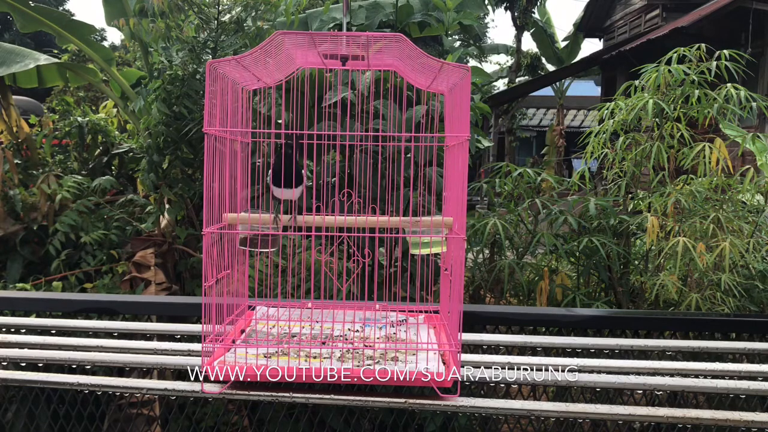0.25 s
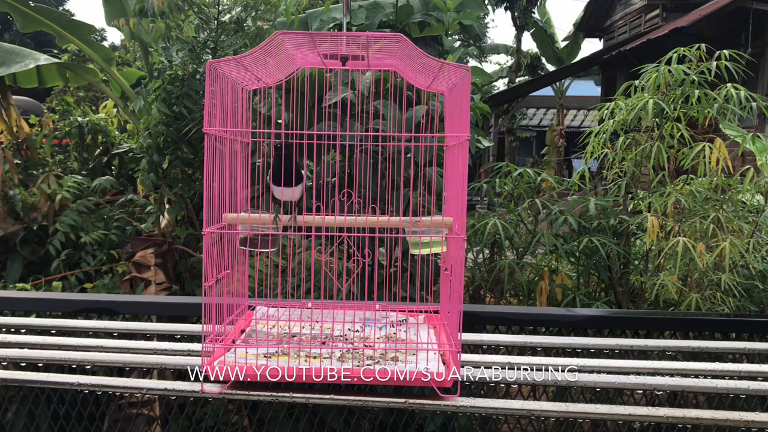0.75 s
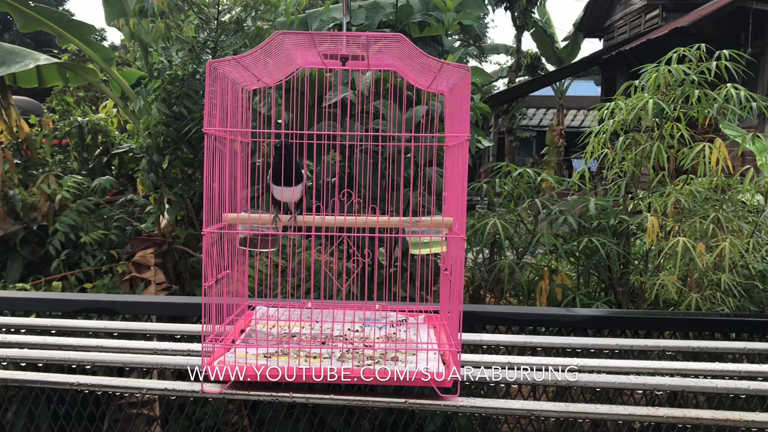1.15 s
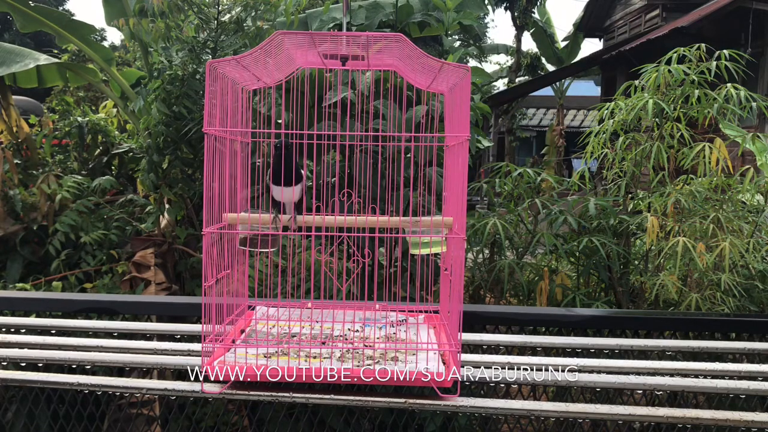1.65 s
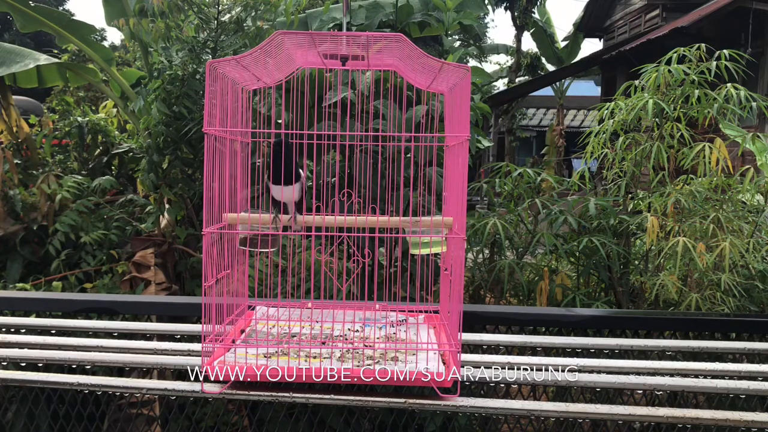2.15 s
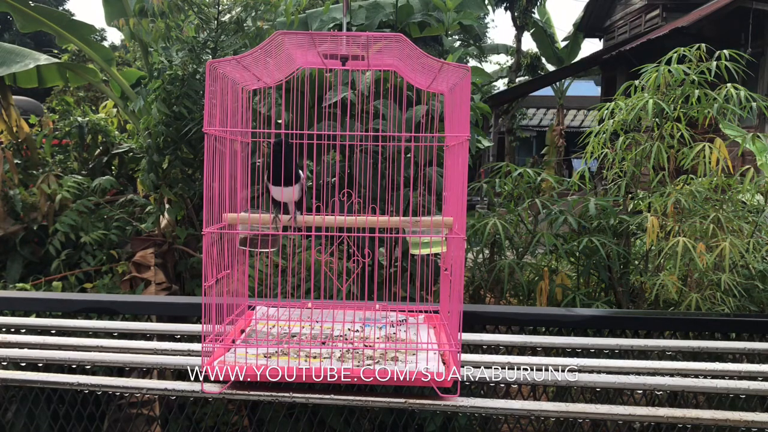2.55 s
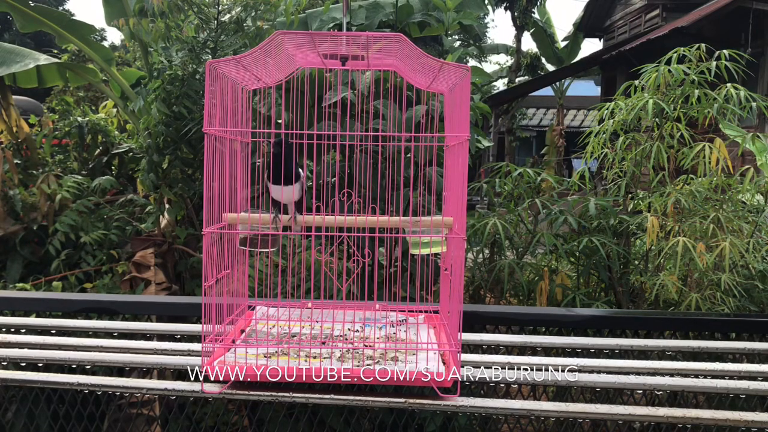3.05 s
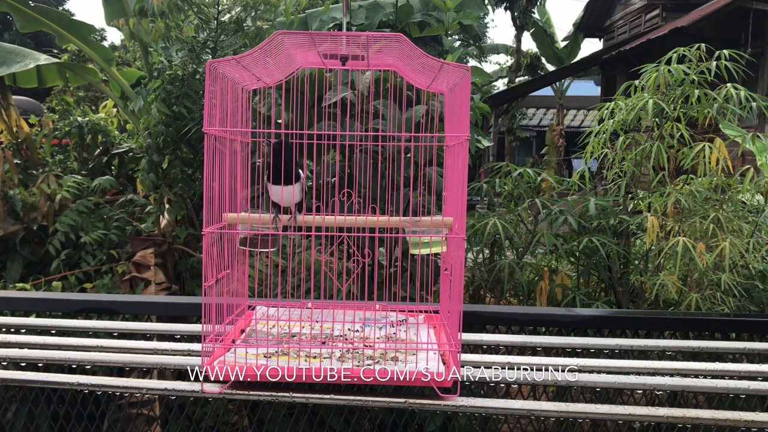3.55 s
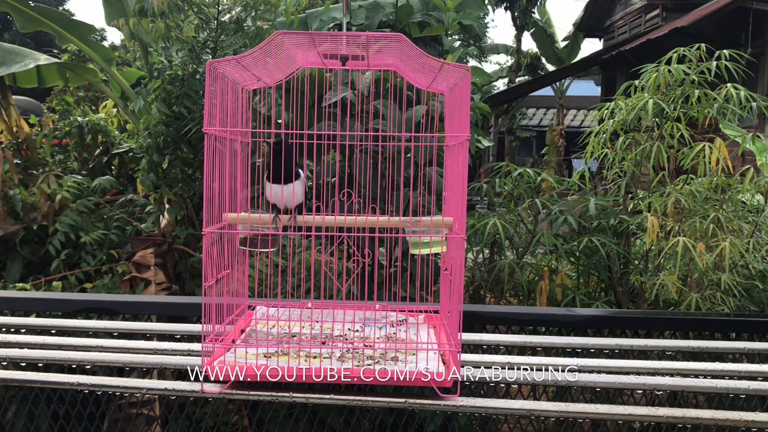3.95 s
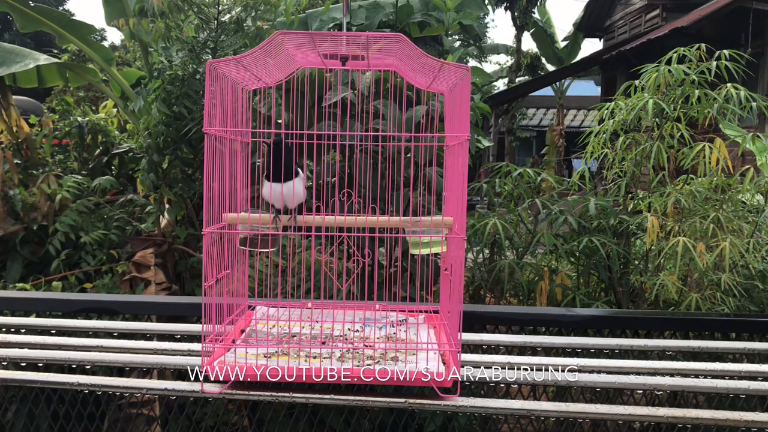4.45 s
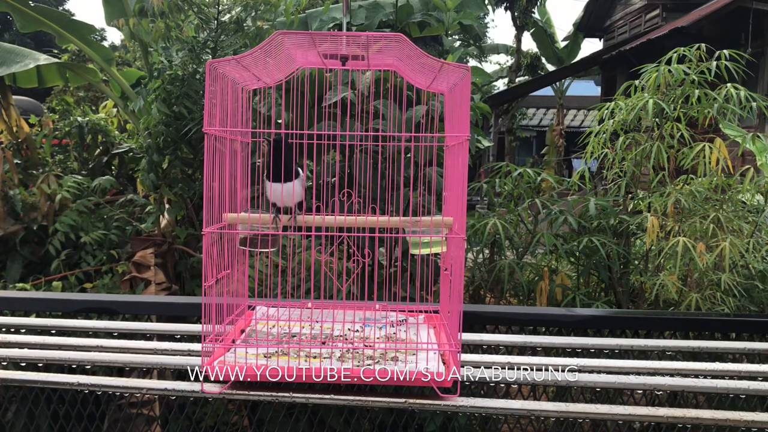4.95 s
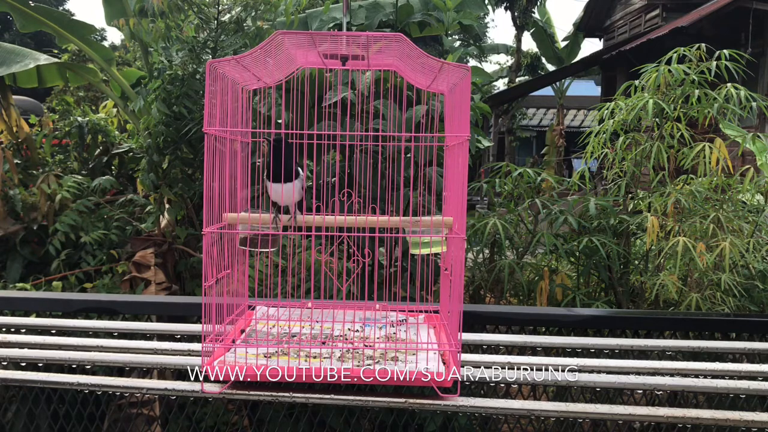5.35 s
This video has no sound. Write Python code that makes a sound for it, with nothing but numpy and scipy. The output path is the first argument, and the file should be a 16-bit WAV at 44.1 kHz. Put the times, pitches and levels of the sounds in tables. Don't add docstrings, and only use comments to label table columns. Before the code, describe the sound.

Outdoors in a garden between walls, a bird whistles separate quick syllables with gaps between them, high and piercing, often two pitches overlapping with a slightly buzzy edge. Another caller whistles very faintly far off. Low engine rumble and gentle hiss lie underneath, with barely audible electronic ticking. The song stops before four seconds; later the feathers brush once, softly. Mono phone pickup, close but airy.

```python
import sys
import numpy as np
from scipy import signal
from scipy.fft import rfft, irfft, next_fast_len
from scipy.io import wavfile
from scipy.ndimage import uniform_filter1d

SR = 44100
rng = np.random.default_rng(int(sys.argv[2]) if len(sys.argv) > 2 else 0)


def log_audio(samples):
    frames = np.atleast_2d(samples).T
    limited = np.clip(frames, -1, 1)
    pcm = np.round(limited * 32767).astype(np.int16)
    wavfile.write(sys.argv[1], SR, pcm)


def rack_gain(trim_db):
    fader = np.asarray(trim_db, float)
    return 10 ** (fader / 20)


N = 246959
T = np.arange(N) / SR


def coloured(x, table):
    hz, db = np.transpose(table)
    n = next_fast_len(len(x))
    f = np.fft.rfftfreq(n, 1 / SR) + 1
    gain = rack_gain(np.interp(np.log(f), np.log(hz), db))
    return irfft(rfft(x, n) * gain, n)[:len(x)]


def level(x, db):
    return x * rack_gain(db) / np.sqrt(np.mean(x ** 2))


def walk(rate):
    k = int(SR / rate)
    return level(uniform_filter1d(uniform_filter1d(rng.standard_normal(N), k), k), 0)


def gate(start, end, edge=.003):
    return np.clip(np.minimum(T - start, end - T) / edge + .5, 0, 1)


# pitch_hz, level_db (per Hz)
GARDEN_COLOUR = [(12, -44), (20, -23), (53, -2), (166, -1), (197, -5.5), (353, -14), (500, -22.5),
                 (792, -22.5), (990, -19.5), (1400, -22.5), (1560, -27.5), (3020, -32), (3370, -32),
                 (6960, -41.5), (15600, -41.5)]
GARDEN_DB = -48
# pitch_hz, width_hz, level_db
ENGINES = [(64.3, 5, -52.5), (100.5, 10, -51.5), (161.5, 5.9, -58.5), (520, 24.4, -67.5)]
# start_s, level_db
ENGINE_SWELL = [(0, 0.5), (.9, -12.5), (1.2, -0.5), (2.8, -0.5), (4.3, 3), (4.7, -3.5), (5.6, -3)]
# pitch_hz, level_db
PORT = [(5000, 0.5), (6200, 2.5), (7500, -3.5), (9400, 5.5), (10600, -3.5), (13000, 5), (15600, 4)]


def garden():
    hiss = coloured(rng.standard_normal(N), GARDEN_COLOUR)
    spectrum, f = rfft(hiss), np.fft.rfftfreq(N, 1 / SR)
    bed, edges = 0, 20 * 2 ** np.arange(11.)
    for lo, hi in zip(edges, edges[1:]):
        octave = irfft(spectrum * ((f >= lo) & (f < hi)), N)
        bed = bed + octave * rack_gain(0.11 * walk(2.0))
    drone = 0
    for hz, width, db in ENGINES:
        resonance = 1 + ((f - hz) / width * 2) ** 2
        band = irfft(rfft(rng.standard_normal(N)) / resonance, N)
        drone = drone + level(band, db) * rack_gain(0.67 * walk(1.0))
    swell = rack_gain(np.interp(T, *np.transpose(ENGINE_SWELL)))
    return coloured(level(bed, GARDEN_DB) + drone * swell, PORT)


TICK_RATE, TICK_START_S, TICK_HZ, TICK_DB = 60, .0128, 13100, -48


def frame_ticks():
    at = np.arange(TICK_START_S, N / SR - .01, 1 / TICK_RATE)
    ticks, t = np.zeros(N), T[:100]
    ticks[(at * SR).astype(int)] = rack_gain(TICK_DB + 3.0 * rng.standard_normal(len(at)))
    ring = t / 0.00013 * np.exp(-t / 0.00018) * np.sin(2 * np.pi * TICK_HZ * t)
    return signal.oaconvolve(ticks, ring)[:N]


# start_s, end_s, clicks_per_s, first_level_db, last_level_db
SPUTTER = [(0.025, 0.11, 700, -56.5, -45), (0.117, 0.13, 1500, -44, -43.5), (0.416, 0.434, 950, -49, -52),
           (0.46, 0.476, 1200, -43, -51), (0.585, 0.615, 2000, -56, -55), (0.741, 0.774, 370, -48, -43),
           (0.826, 0.85, 700, -52, -51), (1.155, 1.171, 1100, -48, -44), (1.174, 1.181, 1100, -42, -47),
           (1.229, 1.29, 1500, -46, -51), (1.71, 1.745, 2300, -56, -45), (1.822, 1.8225, 1500, -48, -48),
           (1.908, 1.916, 1500, -54, -54), (1.927, 1.933, 2300, -46, -44), (1.94, 1.95, 1300, -33, -42),
           (1.955, 2.0, 780, -50, -51.5), (2.211, 2.216, 900, -48, -52), (2.287, 2.303, 800, -33, -42),
           (2.305, 2.355, 350, -51, -47), (2.511, 2.52, 1500, -47, -42), (2.55, 2.578, 1200, -53, -46),
           (2.584, 2.596, 900, -46, -52), (2.863, 2.864, 900, -57, -57), (3.605, 3.66, 900, -58, -49),
           (3.708, 3.713, 820, -46, -46), (3.72, 3.75, 500, -59, -58), (3.755, 3.758, 680, -43, -46),
           (3.77, 3.774, 950, -47, -48), (3.78, 3.8, 300, -52, -58)]
RING_HZ = 3330


def sputter():
    clicks, t = np.zeros(N), T[:400]
    for start, end, rate, first_db, last_db in SPUTTER:
        late, loud = rng.standard_normal((200, 2)).T
        at = start + np.cumsum(np.exp(0.26 * late) / rate) - np.exp(0.34 * late[0]) / rate
        db = np.interp(at, (start, end), (first_db, last_db)) + 2.5 * loud
        heard = at < end
        clicks[(at[heard] * SR).astype(int)] = rack_gain(db[heard])
    ring = 8 * (t / 0.00022) ** 2 * np.exp(-t / 0.00024 + 2j * np.pi * RING_HZ * t) / 2
    return signal.oaconvolve(clicks, ring)[:N]


EDGE_S, EDGE_DB = .0035, -32


def edged(note):
    s, hz, db = np.transpose(note)
    s = np.r_[s[0] - EDGE_S, s, s[-1] + EDGE_S]
    return s, np.r_[hz[0], hz, hz[-1]], np.r_[db[0] + EDGE_DB, db, db[-1] + EDGE_DB]


# start_s, pitch_hz, level_db
STEP_UP = [
    [(0.027, 3148, -44), (0.035, 3580, -32.5), (0.039, 3664, -22), (0.043, 3715, -27), (0.054, 3599, -18),
     (0.07, 3677, -16), (0.103, 3750, -21), (0.114, 3670, -25), (0.126, 4040, -31.5)],
    [(0.077, 4308, -41.5), (0.102, 4520, -32.5), (0.115, 4330, -22.5), (0.124, 4410, -18),
     (0.131, 4500, -22), (0.139, 4376, -18), (0.166, 4488, -15.5), (0.199, 4408, -19), (0.203, 4300, -34.5)],
]
CROSSING = [
    [(0.369, 4223, -38.5), (0.389, 3851, -26), (0.399, 3914, -20.5), (0.433, 4074, -18),
     (0.451, 4022, -15.5), (0.471, 4020, -24.5), (0.483, 3817, -28), (0.555, 3594, -28.5),
     (0.56, 3600, -33)],
    [(.419, 2790, -42), (.427, 2890, -31), (.434, 2810, -43)],
    [(0.463, 3090, -31), (0.469, 3075, -25.5), (0.483, 3020, -25), (0.491, 3120, -22.5),
     (0.589, 3362, -17.5), (0.637, 3425, -14.5), (0.646, 3346, -31)],
]
DIP_RISE = [
    [(0.724, 2910, -41.5), (0.727, 2710, -38.5), (0.739, 2626, -31), (0.758, 2587, -25.5),
     (0.781, 2444, -28.5), (0.802, 2506, -25.5), (0.829, 2500, -27.5), (0.847, 2410, -33),
     (0.849, 2400, -33)],
    [(0.831, 3200, -37), (0.835, 3220, -22.5), (0.84, 3440, -22), (0.853, 3304, -18), (0.894, 3325, -22),
     (0.924, 3396, -19.5), (0.973, 3642, -16.5), (1.032, 3503, -20.5), (1.04, 3500, -37)],
]
DIP_RISE_AGAIN = [
    [(1.136, 2735, -43), (1.154, 2498, -28.5), (1.163, 2830, -30.5), (1.17, 2364, -33)],
    [(1.16, 3510, -36), (1.164, 3420, -33), (1.172, 3130, -44)],
    [(1.177, 2320, -30.5), (1.181, 2223, -29), (1.217, 2067, -32), (1.225, 2127, -29), (1.229, 2246, -32),
     (1.232, 2140, -31.5), (1.274, 2213, -31), (1.314, 2240, -33), (1.317, 2300, -31)],
    [(1.231, 2896, -28), (1.283, 3220, -30.5), (1.29, 3356, -23.5), (1.313, 3350, -23), (1.318, 3380, -17),
     (1.35, 3510, -18.5), (1.381, 3350, -22), (1.391, 3423, -20), (1.474, 3561, -21.5)],
]
LOW_AND_HARSH = [
    [(1.708, 2220, -46), (1.718, 1914, -44), (1.745, 2013, -34), (1.766, 2067, -25), (1.776, 2033, -25),
     (1.809, 2031, -30), (1.815, 1950, -33), (1.822, 1807, -40)],
    [(1.909, 2160, -44.5), (1.926, 2526, -33.5), (1.94, 2846, -21.5)],
    [(1.943, 3110, -15.5), (1.957, 3360, -15), (1.968, 2977, -17), (1.988, 2738, -26.5),
     (2.01, 2696, -25.5), (2.047, 2707, -26), (2.078, 2820, -23.5), (2.083, 2926, -19),
     (2.097, 2614, -27.5)],
]
DROP = [
    [(2.211, 3436, -37.5), (2.219, 3403, -27.5), (2.243, 3410, -17.5), (2.257, 3385, -16.5),
     (2.269, 3256, -18), (2.285, 2840, -22.5), (2.29, 2760, -26)],
    [(2.293, 2152, -34), (2.315, 2241, -27), (2.355, 2214, -25), (2.371, 2083, -30)],
]
STEP_UP_LONG = [
    [(2.509, 2960, -50), (2.513, 3105, -36), (2.526, 3440, -20.5), (2.543, 3370, -19), (2.552, 3633, -13.5),
     (2.566, 3778, -17), (2.587, 3536, -14.5), (2.63, 3583, -21.5), (2.636, 3410, -27.5)],
    [(2.586, 4360, -24.5), (2.598, 4300, -24.5), (2.61, 4450, -20.5), (2.641, 4404, -20), (2.66, 4340, -20),
     (2.686, 4400, -21), (2.728, 4445, -20.5), (2.757, 4466, -22), (2.777, 4387, -22)],
]
TRILLS = [
    [(2.864, 5260, -40), (2.876, 5050, -37), (2.887, 4950, -33), (2.903, 4600, -24), (2.912, 4667, -23),
     (2.925, 4985, -25.5), (2.962, 3660, -20.5), (2.989, 3656, -18), (3.013, 3543, -23.5)],
    [(3.123, 1976, -45.5), (3.148, 2078, -29.5), (3.162, 2067, -27), (3.172, 1976, -34),
     (3.18, 2193, -26.5), (3.202, 2306, -28.5), (3.237, 2254, -29.5), (3.281, 2458, -29.5),
     (3.288, 2220, -41)],
]
STEP_UP_LAST = [
    [(3.579, 3674, -22.5), (3.584, 3800, -26.5), (3.599, 3658, -17), (3.631, 3650, -14), (3.655, 3733, -18),
     (3.675, 3796, -16.5), (3.679, 3678, -19.5), (3.708, 3706, -24), (3.71, 3690, -27)],
    [(3.62, 4600, -52), (3.66, 4560, -35), (3.693, 4250, -25.5), (3.716, 4650, -27), (3.74, 4540, -26),
     (3.762, 4670, -22.5), (3.821, 4480, -18), (3.84, 4780, -22), (3.856, 4680, -40)],
]
PHRASE = (STEP_UP + CROSSING + DIP_RISE + DIP_RISE_AGAIN + LOW_AND_HARSH + DROP + STEP_UP_LONG
          + TRILLS + STEP_UP_LAST)
# level_db, tilt_db (per order)
BRIGHT = [(-7, -1), (-1.5, 0.5), (-4, 3.5), (16.5, 3.5), (-4.5, 1), (1.5, 2), (-11, 2.5), (6.5, -2.5),
          (10, 0.5), (9, 3.35), (1, -0.5), (3.5, 2.5), (18, -0.5), (-2.5, 3.5), (0.5, 0.5), (-6, 3.5),
          (2, 0), (-1, 13.5), (5.5, 0), (-1.5, 1.5), (-2, -1.5), (5.5, -7)]
BRIGHTEN_DB = [14, 7, -0.5, 1.5, -6.2, 1.5, 10.5, -6, -4, 15, 3.5, 9, 3, -1.5, 10, -1, 14.5, 2.5, -16.5, 17,
               7, -10.5]
ORDER_DB = [-17.5, -24, -33.5, -32, -37, -32]
MIXED_DB = [-9.5, -20.5, -24.5]
# pitch_hz, level_db
THROAT = [(3000, -0.5), (4500, 0), (6000, -4.5), (7500, -4.5), (9000, -7), (10500, -5.5), (12000, 4),
          (13300, 4), (14300, -1.5), (15200, -8.5), (17000, -10)]
# start_s, end_s, timing_error_rad
HAZE = [(.05, .125, .2), (.46, .56, .09), (.59, .645, .05), (1.23, 1.29, .08), (1.943, 2.0, .11),
        (2.0, 2.1, .05), (2.29, 2.355, .1), (2.51, 2.56, .07), (2.56, 2.578, .13), (2.584, 2.6, .12),
        (2.93, 3.02, .08), (3.18, 3.29, .067), (3.62, 3.71, .09)]
WOBBLE_HZ, WOBBLE_DB, OVERTONE_FLICKER_DB = 13, 0.5, 2.5
PULL, SIDEBAND_SHARE = .4, .72
UPWARD = .2
RASP, RASP_RATE, FLUTTER_RASP = .35, 2500, .011
HALF_START_S, HALF_END_S, HALF_SHARE = 2.23, 2.25, .4
SHYNESS = 0.4
EFFORT = 0.033


def bird():
    swing_hz, gain = flutter()
    clicks = sputter() + creak()
    wobble_hz, wobble = WOBBLE_HZ * walk(250), rack_gain(WOBBLE_DB * walk(120))
    flow, size, voices = clicks.copy(), np.abs(clicks) + rack_gain(-87.5), []
    own = np.zeros((len(MIXED_DB), N), complex)
    for note in PHRASE:
        s, hz, db = edged(note)
        span = slice(int(s[0] * SR), int(s[-1] * SR))
        hz = np.interp(T[span], s, hz) + swing_hz[span] + wobble_hz[span]
        envelope = uniform_filter1d(rack_gain(np.interp(T[span], s, db)), size=80)
        a = np.sqrt(2) * envelope * gain[span] * wobble[span]
        phase = 2 * np.pi * np.cumsum(hz) / SR
        side = a * np.exp(1j * phase)
        flow[span] += side
        size[span] += a
        own[:, span] += [side ** k for k in range(2, len(MIXED_DB) + 2)]
        voices.append((span, hz, a, phase))

    pressure = np.abs(flow / size) ** 2
    beat = PULL * (pressure - uniform_filter1d(pressure, size=256))
    lift = np.exp(-UPWARD * signal.hilbert(beat, next_fast_len(N))[:N].imag)
    unrest = RASP * np.sqrt(uniform_filter1d(beat ** 2, size=256).clip(0))
    unrest += FLUTTER_RASP * uniform_filter1d(np.abs(np.diff(swing_hz, prepend=0)), size=256)
    unrest += sum(rad * gate(start, end) for start, end, rad in HAZE)
    jitter = unrest * walk(RASP_RATE)

    whistle, over = clicks.real.copy(), np.zeros(N)
    for k, db in enumerate(MIXED_DB, start=2):
        mixed = flow ** k - own[k - 2]
        over += rack_gain(db) * (mixed * np.exp(.5j * k * jitter)).imag / size ** (k - 1)
    flicker = [rack_gain(OVERTONE_FLICKER_DB * walk(65)) for _ in ORDER_DB]
    for (span, hz, a, phase), (bright_db, tilt_db), brighten_db in zip(voices, BRIGHT, BRIGHTEN_DB):
        pulled = phase + SIDEBAND_SHARE * beat[span] + 0.061 * jitter[span]
        whistle[span] += a * lift[span] * np.cos(pulled)
        growth = rack_gain(brighten_db * np.linspace(-.5, .5, len(a)))
        strength = a * growth * (a / a.max()) ** EFFORT
        uneven = 1 + HALF_SHARE * gate(HALF_START_S, HALF_END_S)[span] * np.cos(phase / 2)
        for k, db in enumerate(ORDER_DB, start=2):
            room_above = np.clip((18500 - k * hz) / 1500, 0, 1)
            shy = (a / size[span]) ** (SHYNESS * (k - 1))
            loudness = rack_gain(db + bright_db + tilt_db * (k - 2)) * flicker[k - 2][span]
            overtone = np.cos(k * (phase + beat[span] + jitter[span]))
            over[span] += strength * shy * loudness * uneven ** min(k - 1.7, 1) * room_above * overtone
    return coloured(whistle, [(1300, -30.0), (1750, 1)]) + coloured(over, THROAT)


# delay_s, level_db
ECHOES = [(.004, -18.5), (.011, -18), (.021, -21.5), (0.044, -28.5), (.128, -46)]
YARD_DB, YARD_T60_S, WALL_S = -26.5, 0.94, 0.17
TAIL_DB, TAIL_T60_S = -20, 0.53


def yard(x):
    t = T[:SR]
    near = level(rng.standard_normal(SR), 0) * rack_gain(-60 * t / YARD_T60_S)
    near *= np.clip((WALL_S - t) / 0.0081, 0, 1)
    far = rng.standard_normal(SR) * rack_gain(-60 * t / TAIL_T60_S)
    response = rack_gain(YARD_DB) * near / np.linalg.norm(near) + rack_gain(TAIL_DB) * far / np.linalg.norm(far)
    for s, db in ECHOES:
        response[int(s * SR)] += rack_gain(db)
    echoed = signal.fftconvolve(x, response)[:N]
    return coloured(echoed, [(2000, -3.0), (5000, -2.0), (10000, -5.5), (16000, -6.0)])


DUCK_HZ, DUCK_FROM_DB, DUCK_SLOPE, DUCK_S = 4600, -48.5, .35, .04


def ducked(bed, song):
    loud_db = 10 * np.log10(uniform_filter1d(song ** 2, int(DUCK_S * SR)).clip(1e-12))
    treble = signal.sosfiltfilt(signal.butter(4, DUCK_HZ, "high", fs=SR, output="sos"), bed)
    return bed - treble * (1 - rack_gain(-DUCK_SLOPE * np.clip(loud_db - DUCK_FROM_DB, 0, 40)))


# start_s, end_s, first_pitch_hz, last_pitch_hz, level_db
FAR = [
    (.09, .2, 1390, 1375, -53),
    (.14, .24, 1540, 1550, -58),
    (.12, .23, 780, 775, -54),
    (.24, .34, 835, 820, -55),
    (.23, .4, 1685, 1650, -54.5),
    (2.19, 2.26, 1120, 1260, -55),
    (2.27, 2.36, 1400, 1750, -53),
    (2.33, 2.5, 1680, 1780, -56),
    (4.27, 4.34, 3060, 2990, -69),
]
FAR_EDGE_S, FAR_BLUR_HZ = .03, 32


def far_caller():
    out = 0
    for start, end, first_hz, last_hz, db in FAR:
        blur_hz = (FAR_BLUR_HZ + abs(last_hz - first_hz) / 4) * walk(300)
        hz = np.interp(T, (start, end), (first_hz, last_hz)) + blur_hz
        whistle = np.sin(2 * np.pi * np.cumsum(hz) / SR)
        out = out + gate(start, end, FAR_EDGE_S) * rack_gain(db + 4 * walk(40)) * whistle
    return out


# start_s, end_s, rate_hz, first_swing_hz, last_swing_hz
FLUTTER = [(.585, .618, 390, 15, 30), (.618, 0.66, 480, 70, 110), (1.945, 1.949, 512, 220, 117),
           (1.8, 2.02, 470, 60, 60), (1.956, 2.01, 106.6, 107, 153), (2.025, 2.05, 70, 63, 50),
           (2.022, 2.068, 503, 188, 190), (1.995, 2.022, 93, 150, 140), (2.089, 2.115, 527, 170, 200),
           (2.9075, 2.9839, 157, 170, 540), (2.9839, 3.015, 157, 540, 120), (3.1, 3.27, 77, 57, 49.9),
           (2.563, 2.578, 509.4, 86, 122), (2.632, 2.618, 500, 100, 100), (1.4, 1.474, 20, 30, 30),
           (3.79, 3.825, 300, 40, 60), (2.31, 2.355, 170, 25, 35)]
SWING_SHARE, SWING_FULL_HZ = .45, 540


def flutter():
    swing_hz, gain = np.zeros(N), np.ones(N)
    for start, end, rate_hz, first_hz, last_hz in FLUTTER:
        phase = 2 * np.pi * np.cumsum((T > start) * rate_hz * (1 + .04 * walk(120))) / SR
        depth_hz = gate(start, end) * np.interp(T, (start, end), (first_hz, last_hz))
        swing_hz += depth_hz * np.sin(phase)
        gain *= 1 + SWING_SHARE * np.sqrt(depth_hz / SWING_FULL_HZ) * np.sin(phase - .6)
    return swing_hz, gain


# start_s, pulses_per_s, ring_hz, level_db
CREAK = [
    [(1.701, 260, 3900, -46), (1.744, 470, 2900, -35)],
    [(.807, 250, 3200, -37), (.832, 400, 3300, -36)],
]


def creak():
    out, t = np.zeros(N, complex), T[:300]
    for (start, rate, hz, db), (end, last_rate, last_hz, last_db) in CREAK:
        at = start
        for late, loud in rng.standard_normal((40, 2)):
            if at < end:
                u = (at - start) / (end - start)
                ring_hz = hz + u * (last_hz - hz)
                ring = 4 * t / 0.00018 * np.exp(-t / 0.0004 + 2j * np.pi * ring_hz * t)
                i = int(at * SR)
                out[i:i + len(t)] += ring * rack_gain(db + u * (last_db - db) + 1.5 * loud)
                at += (1 + .06 * late) / (rate + u * (last_rate - rate))
    return out


# pitch_hz, level_db (per Hz)
RUFFLE_COLOUR = [(880, -23), (1500, -19), (1940, -13), (2160, -15.5), (3100, -8.5), (3620, -6),
                 (4820, -23.5), (6400, -23.5), (7560, -33), (9380, -24), (10700, -36), (13800, -27),
                 (15600, -38)]
RUFFLE_S, RUFFLE_DB, RUFFLE_SPREAD_S = 4.861, -46.5, 0.12


def ruffle():
    grain = rng.standard_normal(N) * rack_gain(0.27 * walk(300))
    swish = level(coloured(grain, RUFFLE_COLOUR), 1.3)
    return swish * rack_gain(RUFFLE_DB) * np.exp(-np.abs((T - RUFFLE_S) / RUFFLE_SPREAD_S) ** 1.45)


def scene():
    song = bird()
    heard = song + yard(song)
    mix = heard + far_caller() + ruffle()
    mix = mix + ducked(garden() + frame_ticks(), heard)
    return mix[None]


def low_pass(x):
    return signal.sosfilt(signal.butter(12, 15770, fs=SR, output="sos"), x)


def record(dry):
    top_cut = signal.ellip(8, .2, 40, 15600, fs=SR, output="sos")
    mix = signal.sosfiltfilt(top_cut, dry)
    return low_pass(mix)


dry = scene()
out = record(dry)
log_audio(out)
```